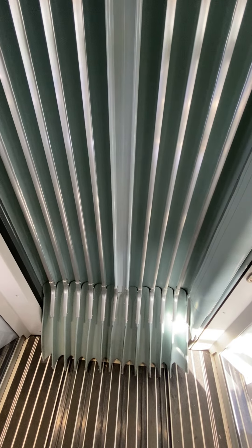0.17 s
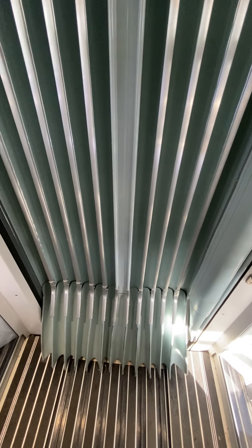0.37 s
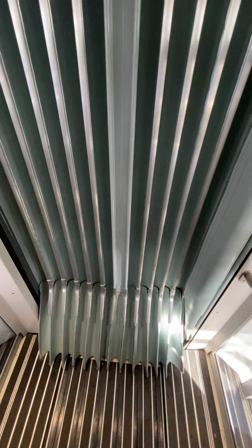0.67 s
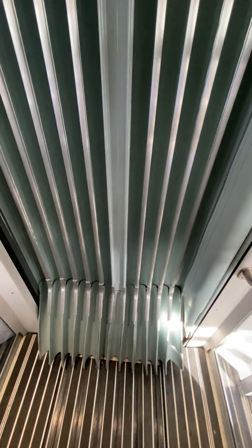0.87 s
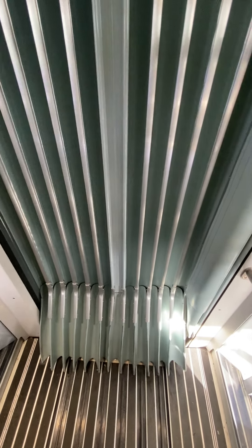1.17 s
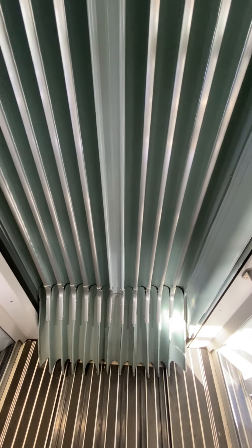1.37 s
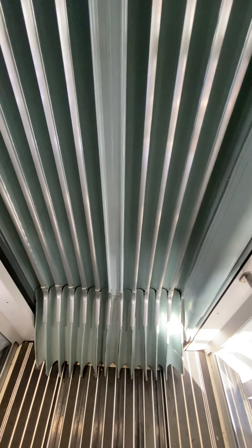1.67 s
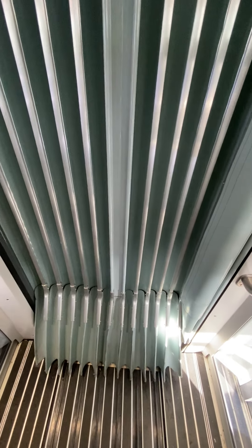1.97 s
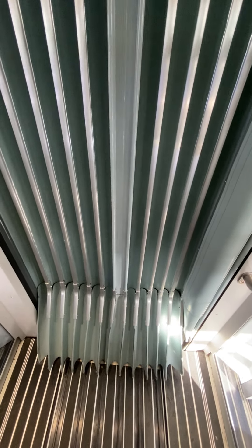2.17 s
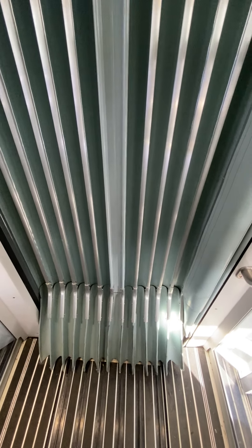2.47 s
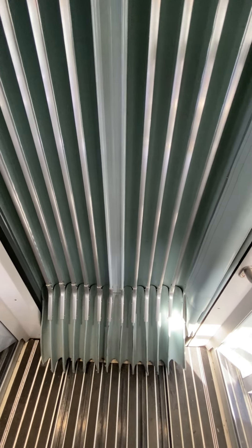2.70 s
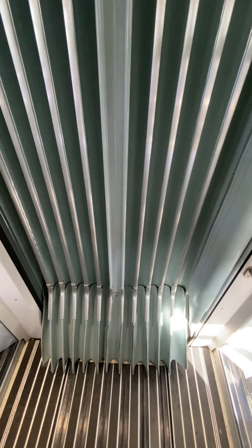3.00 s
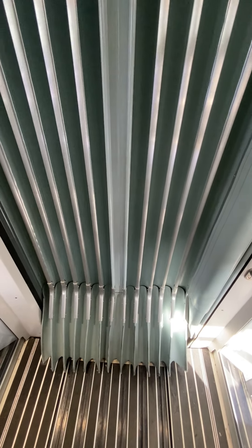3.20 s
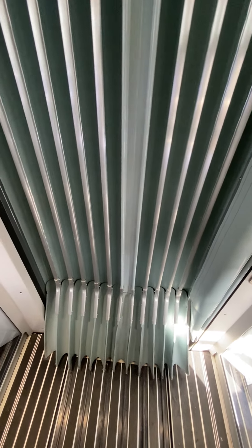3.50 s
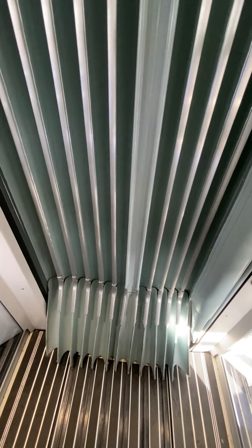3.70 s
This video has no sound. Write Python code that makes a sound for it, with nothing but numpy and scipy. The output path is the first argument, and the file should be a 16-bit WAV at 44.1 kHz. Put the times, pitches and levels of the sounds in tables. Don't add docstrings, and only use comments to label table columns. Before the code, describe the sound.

Moving train's gangway rumbles low with soft thumps, rubber folds hissing, one squeak and a scrape

```python
import sys
import numpy as np
from scipy import signal
from scipy.fft import rfft, irfft
from scipy.io import wavfile
from scipy.ndimage import uniform_filter1d

SR = 44100
rng = np.random.default_rng(int(sys.argv[2]) if len(sys.argv) > 2 else 0)


def log_audio(samples):
    frames = np.atleast_2d(samples).T
    limited = np.clip(frames, -1, 1)
    pcm = np.round(limited * 32767).astype(np.int16)
    wavfile.write(sys.argv[1], SR, pcm)


def elevation(decibels):
    levels = np.asarray(decibels, float)
    return 10 ** (levels / 20)


N = 169785

# centre [t/s], width [t/s], level [dB]
BODY_HEAVES = [(0.094, 0.035, -29), (.333, 0.031, -30.5), (.693, 0.045, -46.5), (0.902, 0.24, -30),
               (1.154, 0.031, -30), (1.345, 0.028, -26.5), (1.468, 0.055, -29.5), (1.663, 0.037, -25),
               (1.732, 0.084, -23.5), (1.92, 0.058, -24.5), (2.129, 0.15, -30.5), (2.311, 0.017, -18.5),
               (2.435, 0.095, -22.5), (2.719, 0.091, -21.5), (2.904, 0.021, -24), (3.199, 0.057, -36.5),
               (3.466, 0.036, -26.5), (3.746, 0.018, -36.5)]
HEAVE_HZ, HEAVE_WANDER, HEAVE_BASE_DB = 51, 0.08, -33

# centre [t/s], width [t/s], level [dB], pitch [f/Hz]
PANEL_THUMPS = [(.873, 0.026, -16.5, 154.4), (1.039, .03, -29, 144.8), (1.109, 0.014, -19.5, 167),
                (1.186, 0.03, -17.5, 151), (1.208, 0.015, -20.5, 240), (1.404, 0.063, -21, 130),
                (1.662, 0.02, -21.5, 229.6), (1.72, 0.12, -26.5, 128.3), (1.807, 0.037, -28, 242),
                (1.946, 0.032, -21.5, 124), (1.9, 0.027, -25, 180), (2.321, 0.023, -27, 143),
                (3.108, 0.02, -24, 167), (3.1, 0.017, -28.5, 237.5), (3.112, 0.023, -31, 322),
                (3.325, 0.023, -29, 230.8), (1.0, 0.026, -26.5, 235), (1.975, 0.032, -26, 245),
                (1.99, .03, -27.5, 175), (1.79, .03, -29, 310), (3.5, 0.027, -26, 140),
                (3.42, 0.046, -30, 105), (.7, 0.029, -31, 150.3), (2.44, 0.042, -27.5, 172),
                (2.65, 0.036, -31.5, 315), (1.19, .03, -30, 330), (2.12, .04, -34, 340),
                (2.86, .03, -38, 420), (.2, .05, -31, 80), (3.33, .05, -31, 75), (1.1, .03, -28, 235)]

# time [t/s], level [dB]
TRACK_SHAKE = [(0, -31), (.64, -34), (.71, -29), (.8, -34), (1.0, -30.5), (1.19, -23.5), (1.3, -34),
               (1.41, -22), (1.58, -35), (1.68, -24), (1.87, -32), (2.0, -26.5), (2.26, -34), (2.32, -26.5),
               (2.53, -35), (2.63, -28.5), (3.06, -32), (3.85, -35)]

# centre [f/Hz], width [f/Hz], level [dB]
BODY_MODES = [(54.4, 30.6, 3.5), (122.5, 22, -1.5), (149, 38.6, -0.5), (176, 18, -2), (241.4, 32, -4),
              (313.7, 14.4, -4.5), (344.3, 28.7, -9.5), (414.4, 24, -15), (476.5, 22, -19.5),
              (665.5, 20.3, -20)]
BODY_DB, BODY_FOLLOWS = 3, 0.98

# centre [t/s], width [t/s], level [dB], brightness [dB per octave]
JOINT_JOLTS = [
    (1.187, 0.044, -42, -2.5),
    (1.418, 0.057, -36.5, 0),
    (1.723, 0.07, -35.5, 0.5),
    (1.95, 0.042, -46, -1.5),
    (2.028, .022, -42.5, 7),
    (2.051, 0.19, -54.5, 6),
    (2.325, 0.035, -47, -6),
    (2.635, 0.044, -46, -4.5),
    (3.516, 0.018, -41.5, -0.5),
    (3.601, 0.04, -47, 1),
]

# frequency [f/Hz], level [dB per Hz]
JOLT_SPECTRUM = [(210, -36), (350, -5.5), (768, -18), (1340, -24.5), (2220, -23), (4790, -39), (5920, -36),
                 (10500, -59.5), (13000, -94)]

# start [t/s], length [t/s], level [dB]
FOLD_RUBS = [(0.44, 0.12, -55), (0.576, 0.11, -52), (1.194, 0.082, -50.5), (1.38, 0.12, -51.5),
             (1.515, .05, -57.5), (1.671, 0.1, -54), (1.886, 0.23, -43.5), (2.632, 0.28, -49),
             (2.73, 0.069, -51), (2.838, 0.15, -40), (3.014, 0.18, -59)]
RUB_RISE_S, RUB_FALL_S = 0.016, 0.029

# frequency [f/Hz], level [dB per Hz]
RUB_SPECTRUM = [(1500, -18.5), (3000, -5), (5500, -7), (8500, -7), (10500, -5), (12500, -3.5), (15500, -26)]

# centre [f/Hz], width [f/Hz], level over the hiss [dB]
PLATE_MODES = [(2500, 85, 8.5), (3970, 130, -1), (4680, 270, 9), (5080, 51, 8.5), (5530, 300, 4.5),
               (6070, 72, 4), (7500, 110, 3), (8580, 71, 3)]

# time [t/s], slip rate [f/Hz], level [dB]
SQUEAK_TRACK = [
    (2.69, 9300, -64),
    (2.725, 7700, -56),
    (2.742, 6250, -46),
    (2.772, 4950, -50),
    (2.795, 4560, -46),
    (2.83, 4500, -46),
    (2.848, 3800, -48),
    (2.888, 2620, -49),
    (2.945, 2560, -58),
]

# time [t/s], slip rate [f/Hz], level [dB]
CHIRP_TRACK = [
    (1.868, 2050, -70),
    (1.89, 2020, -59),
    (1.918, 2000, -61),
    (1.945, 1150, -54),
    (1.955, 1100, -70),
]

# time [t/s], slip rate [f/Hz], level [dB]
SCRAPE_TRACK = [
    (3.267, 2530, -80),
    (3.295, 2480, -62),
    (3.335, 2450, -53),
    (3.45, 2430, -51.5),
    (3.52, 2365, -52.5),
    (3.679, 2290, -54),
    (3.779, 2225, -58),
    (3.85, 2200, -66),
]
SCRAPE_HISS_DB = 19
SLIP_CUT_HZ = 3000
TAIL_T60_S, WET_DB = .13, -1

# start [t/s], level [dB], decay time [t/s]
FOLD_TICKS = [
    (.338, -57, .004),
    (1.942, -47.5, .006),
    (2.021, -41, 0.015),
    (2.027, -46.5, .008),
    (2.122, -51, .006),
    (2.725, -50.5, .005),
    (3.135, -59, .005),
    (3.2, -56.5, 0.0068),
]

# centre [t/s], width [t/s], pitch
# [f/Hz], drift [Hz per s], level [dB]
SINGING_LINES = [(.1, .7, 2445, 0, -63), (1.5, 1.1, 2450, 0, -63), (2.6, .6, 2450, 0, -64),
                 (.45, .6, 2005, 0, -63), (1.35, .3, 1990, 0, -63), (2.3, .25, 2005, 0, -60),
                 (2.65, .3, 2015, 60, -61), (3.3, .05, 5055, 0, -57), (3.39, .13, 5070, -200, -47),
                 (3.55, .2, 5040, -300, -51), (3.75, .15, 5000, 0, -60), (3.38, .09, 2600, -500, -49),
                 (3.58, .2, 2400, -500, -57), (3.44, .15, 7270, -500, -49), (3.56, .15, 7030, -1500, -53),
                 (3.55, .25, 6480, -400, -54), (3.6, .16, 4500, -300, -52), (3.72, .13, 8650, 0, -58),
                 (2.06, .08, 6050, 0, -59), (1.415, .05, 5450, 0, -56), (1.44, .08, 5950, 0, -57),
                 (1.44, .09, 8300, 0, -62), (1.22, .08, 5450, 0, -61), (1.75, .09, 5900, 0, -59),
                 (2.925, .06, 5900, 0, -54), (2.82, .05, 9070, 0, -56), (2.9, .04, 5220, 0, -53)]
SING_WIDTH = .02

# frequency [f/Hz], level [dB per Hz]
ROLL_SPECTRUM = [(240, -36.5), (400, -6.5), (785, -15.5), (1780, -22.5), (2010, -20), (3940, -27.5),
                 (7290, -41.5), (9920, -55.5), (13300, -99.5)]
ROLL_DB, ROLL_FOLLOWS = -37, 0.13

# frequency [f/Hz], coherence [0-1]
PORT_LIKENESS = [(60, .999), (330, .98), (650, .45), (1300, .62), (2700, .35), (5000, .65), (9000, .88),
                 (12000, .96)]

# frequency [f/Hz], phase [radians]
LEFT_LEAD = [(0, 0), (860, .5), (1890, .1), (2410, 1.7), (4400, .9), (5200, 6.2), (9470, 8), (13000, 9.2)]

# frequency [f/Hz], level [dB]
LEFT_COLOUR = [(200, 0), (1400, 1.5), (2800, -0.5), (5500, -2.5), (10000, 3), (13000, 2)]
TILT_DB = -1.27

HZ = np.fft.rfftfreq(512, 1 / SR)[:, None]
T = np.arange(N // 128 + 5) * 128 / SR


def evened(x):
    return x / np.sqrt(np.mean(x ** 2) + 1e-20)


def smoothed(x, size):
    return uniform_filter1d(uniform_filter1d(x, size), size)


def swell(t, centre, width):
    return np.exp(-2 * ((t - centre) / width) ** 2)


def read(points, hz):
    f, value = np.transpose(points)
    return np.interp(np.log(hz + 1), np.log(f + 1), value)


def curve(points, column=1):
    columns = np.transpose(points)
    return np.interp(np.arange(N) / SR, columns[0], columns[column])


def peaks(modes, hz):
    power = sum(elevation(db) ** 2 / (1 + (2 * (hz - f) / width) ** 2) ** 1.221 for f, width, db in modes)
    return np.sqrt(power)


def unit(spectrum):
    gain = elevation(read(spectrum, HZ)) / (1 + (spectrum[0][0] / (HZ + 1)) ** 6)
    return gain / np.sqrt(np.sum(gain ** 2)) * np.sqrt(96)


def patchy(gain, patchy_db, flicker_db):
    a, b, c, d, p = rng.standard_normal((len(T), len(HZ), 5)).T
    patches = uniform_filter1d(uniform_filter1d(p, size=6, axis=0), size=14, axis=1)
    flicker = uniform_filter1d(uniform_filter1d(p[::-1], size=60, axis=0), size=3, axis=1)
    unsteady = elevation(patchy_db * evened(patches) + flicker_db * evened(flicker))
    z = np.array([a + 1j * b, c + 1j * d]) * gain * unsteady
    return signal.istft(z / np.sqrt(2 * 96), nperseg=512, noverlap=384)[1][:, :N] / 2


def heave():
    t = np.arange(N) / SR
    wander = evened(smoothed(rng.standard_normal((2, N)), 700))
    level = elevation(HEAVE_BASE_DB) + sum(elevation(db) * swell(t, s, width) for s, width, db in BODY_HEAVES)
    turns = np.cumsum(HEAVE_HZ * (1 + HEAVE_WANDER * wander), axis=1) / SR
    return np.sqrt(2) * level * elevation(1.9 * wander[::-1]) * np.sin(2 * np.pi * turns)


def thumps():
    t, out = np.arange(N) / SR, np.zeros((2, N))
    phase = rng.random((len(PANEL_THUMPS), 2))
    for (s, width, db, hz), turn in zip(PANEL_THUMPS, phase):
        tone = np.sin(2 * np.pi * (hz * t + turn[:, None]))
        out += elevation(db) * np.sqrt(2) * swell(t, s, width) * tone
    return out


def body():
    hz = np.fft.rfftfreq(N, 1 / SR)
    gain = peaks(BODY_MODES, hz) / (1 + (35 / (hz + 1)) ** 4)
    ringing = evened(irfft(rfft(rng.standard_normal((2, N))) * gain, N))
    shake_db = curve(TRACK_SHAKE)
    mean_db = shake_db.mean()
    return ringing * elevation(BODY_DB + mean_db + BODY_FOLLOWS * (shake_db - mean_db))


def jolts():
    octaves = np.log2((HZ + 99) / 1500)
    gain = sum(elevation(db + tilt_db * octaves) * swell(T, s, width) for s, width, db, tilt_db in JOINT_JOLTS)
    plates = np.hypot(1, 0.45 * peaks(PLATE_MODES, HZ))
    return patchy(gain * unit(JOLT_SPECTRUM) * elevation(13.5) * plates, patchy_db=2.0, flicker_db=1.8)


def rubs():
    gain = 0
    for s, length, db in FOLD_RUBS:
        rise = np.clip((T - s) / RUB_RISE_S, 0, 1)
        gain = gain + elevation(db) * rise * np.exp(-np.maximum(T - s - length, 0) / RUB_FALL_S)
    s, _, db = np.transpose(SCRAPE_TRACK)
    gain = gain + elevation(np.interp(T, s, db, left=-140) + SCRAPE_HISS_DB)
    plates = np.hypot(1, peaks(PLATE_MODES, HZ))
    return patchy(gain * unit(RUB_SPECTRUM) * plates, patchy_db=2.6, flicker_db=1.2)


def slips(track, orders_db, jitter, smooth_s, flutter_db):
    t, size = np.arange(N) / SR, max(int(smooth_s * SR), 2)
    wobble = evened(smoothed(rng.standard_normal((len(orders_db) + 1, N)), size))
    rate = curve(track)
    turns = np.cumsum(rate * (1 + jitter * wobble[-1])) / SR
    x = 0
    for k, db in enumerate(orders_db):
        hz = (k + 1) * rate
        audible = (hz < .4 * SR) / (1 + (SLIP_CUT_HZ / hz) ** 6)
        x = x + elevation(db + flutter_db * wobble[k]) * np.sin(2 * np.pi * (k + 1) * turns) * audible
    sliding = (t > track[0][0]) * (t < track[-1][0])
    x = x * np.sqrt(2) * elevation(curve(track, column=2)) * sliding
    tail = rng.standard_normal((2, SR // 4)) * elevation(-60 * t[:SR // 4] / TAIL_T60_S)
    wet = signal.fftconvolve(x[None], tail / np.linalg.norm(tail[0]), axes=1)[:, :N]
    return np.array([x + elevation(WET_DB) * wet[0], wet[1]])


def rubber():
    squeak = slips(SQUEAK_TRACK, [-1, -4, -7], jitter=.012, smooth_s=.0012, flutter_db=4)
    chirp = slips(CHIRP_TRACK, [-4, -2, 0, -1, -6, -6], jitter=.012, smooth_s=.002, flutter_db=4)
    scrape = slips(SCRAPE_TRACK, [-8, -12, -9], jitter=.03, smooth_s=.0006, flutter_db=5)
    return squeak + chirp + scrape


def ticks():
    t, level = np.arange(N) / SR, 0
    for s, db, length in FOLD_TICKS:
        level = level + elevation(db) * (t > s) * np.exp(-np.maximum(t - s, 0) / length)
    bright = np.diff(rng.standard_normal((2, N + 1)), axis=1)
    return level * evened(bright + rng.standard_normal((2, N)))


def sings():
    out = np.zeros((2, N))
    for s, width, hz, drift, db in SINGING_LINES:
        first, last = max(int((s - 1.3 * width) * SR), 0), min(int((s + 1.3 * width) * SR), N)
        t = np.arange(first, last) / SR - s
        a, b = smoothed(rng.standard_normal((2, 2, len(t))), int(.4 * SR / (SING_WIDTH * hz)))
        turn = 2 * np.pi * (hz * t + drift * t ** 2 / 2)
        line = evened(a * np.cos(turn) + b * np.sin(turn))
        out[:, first:first + len(t)] += elevation(db) * swell(t, 0, width) * line
    return out


def rolling():
    shake_db = np.interp(T, *np.transpose(TRACK_SHAKE))
    follow = elevation(ROLL_FOLLOWS * (shake_db - shake_db.mean()))
    plates = np.hypot(1, 0.41 * peaks(PLATE_MODES, HZ))
    return patchy(elevation(ROLL_DB) * unit(ROLL_SPECTRUM) * plates * follow, patchy_db=2.0, flicker_db=1.1)


def ports(pair):
    hz = np.fft.rfftfreq(N, 1 / SR)
    common, unrelated = rfft(pair)
    same = np.clip(read(PORT_LIKENESS, hz), 0, 1)
    tilt = elevation((TILT_DB + read(LEFT_COLOUR, hz)) / 2)
    lead = np.exp(1j * np.interp(hz, *np.transpose(LEFT_LEAD)))
    left = common * lead * tilt
    right = (same * common + np.sqrt(1 - same ** 2) * unrelated) / tilt
    return irfft(np.array([left, right]), N)


def scene():
    car = heave() + thumps() + body() + jolts()
    folds = rubs() + rubber() + ticks()
    return ports(car + folds + sings() + rolling())


def band_limit(x):
    return signal.sosfilt(signal.butter(12, 15800, fs=SR, output="sos"), x)


def record(dry):
    return band_limit(dry)


dry = scene()
out = record(dry)
log_audio(out)
```